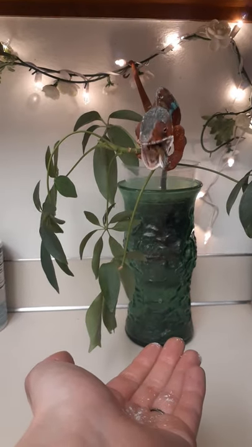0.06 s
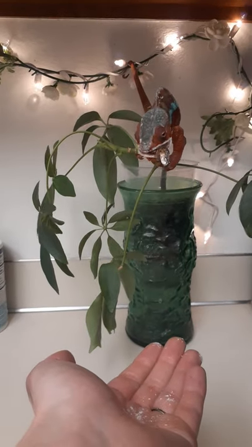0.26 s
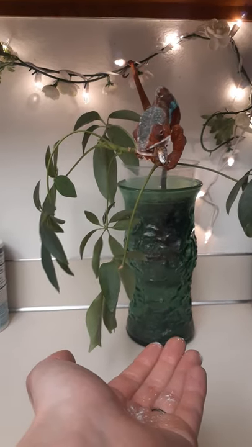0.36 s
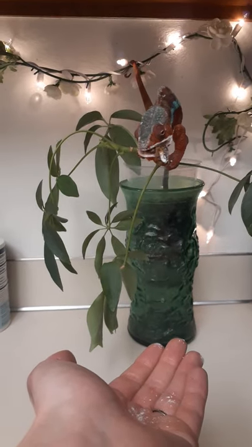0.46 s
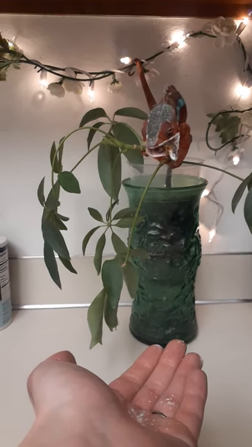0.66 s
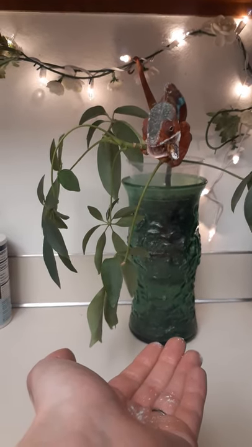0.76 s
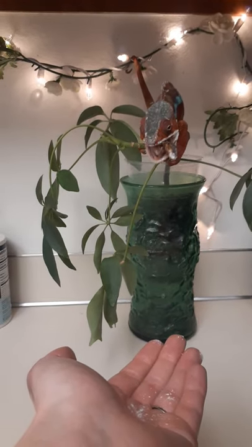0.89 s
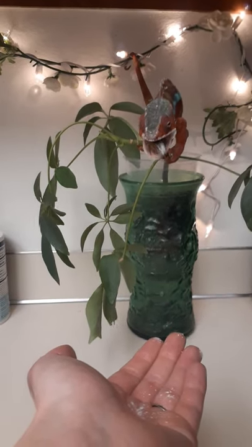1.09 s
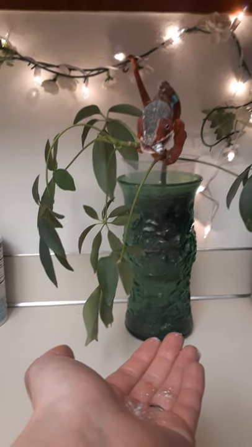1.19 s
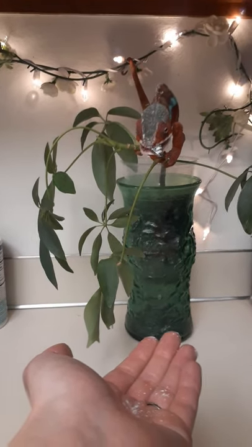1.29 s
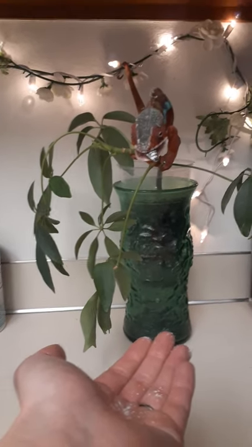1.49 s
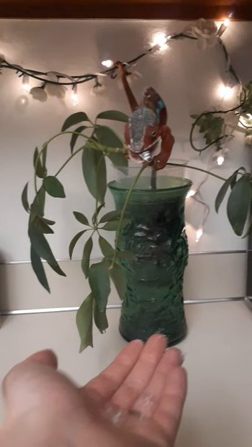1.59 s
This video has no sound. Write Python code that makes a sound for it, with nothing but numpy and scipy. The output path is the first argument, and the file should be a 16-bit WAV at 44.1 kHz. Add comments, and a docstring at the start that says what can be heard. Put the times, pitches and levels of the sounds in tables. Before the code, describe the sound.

Crisp crunching of a chameleon chewing an insect twice, with soft microphone bumps.

```python
"""A chameleon chews an insect in a small, quiet room, close to a hand-held camera; mains hum and faint hiss.
0.13-0.32 s: first bite. The shell creaks, then cracks in quick runs of tiny fractures; the room rings.
0.2-0.8 s: the hand bumps the camera softly at the left microphone. Stray cracks follow the bite until 1 s.
1.16-1.41 s: second bite, with a creak, cracks and more bumps.
From 1.45 s: a faint rustle as the camera shifts."""
import sys
import numpy as np
from scipy import signal
from scipy.fft import rfft, irfft
from scipy.io import wavfile
from scipy.ndimage import uniform_filter1d

SR = 44100
rng = np.random.default_rng(int(sys.argv[2]) if len(sys.argv) > 2 else 0)


def int16_out(signal):
    """Quantize to a 16-bit WAV file."""
    q = np.round(np.clip(np.atleast_2d(signal).T, -1, 1) * 32767)
    wavfile.write(sys.argv[1], SR, q.astype(np.int16))


N = 72765

# insect shell spectrum (frequency [Hz], gain [dB])
SHELL_SPECTRUM = [(300, -33), (1000, -45), (2500, -22.5), (3600, -18), (4600, -9.5), (6500, -8.5),
                  (8300, -9.5), (10000, -3), (11700, 0.5), (13000, -2.5), (15000, -0.5), (16800, -17.5)]


def chewing(echo_count=3):
    """Cracks and creaks of the shell, echoing in the room, dealt in turn among random echo patterns."""
    # (time [s], relative level [dB], length [s], mouth ring [dB], piece ring [dB], piece pitch [Hz])
    cracks = [(.1333, -64, 0.0018, 12, 22, 6750), (.1585, -34, 0.0026, 2, 5, 6000),
              (.1662, -24.5, 0.0037, 12, 5.5, 5060), (.1765, -34, 0.0035, 2, 3, 6000),
              (.1810, -24, 0.0036, -28, 3, 6500), (.2025, -1.5, 0.00066, -21, 4, 7130),
              (.2110, -23.5, 0.0024, 14, 0, 7500), (.2180, -30.5, 0.005, 19, -8, 7500),
              (0.2536, -18, 0.0031, 5.5, -9, 6100), (0.2706, -24.5, 0.0008, 6, 3, 6500),
              (.2765, -21, 0.0018, 8.5, 2, 6150), (.2790, -16.5, 0.0024, 2, -1, 6200),
              (.2911, -17.5, 0.00052, 4, 8.5, 5160), (.2923, -5, 0.0012, -4, 2.5, 5600),
              (.2947, -7.5, .0018, 0.5, 0.5, 5250), (.3128, -17.5, 0.002, 3, 8.5, 4940),
              (.5241, -29.5, .0008, 10.5, 1, 5600), (0.826, -44.5, 0.0021, 13, 11.5, 6300),
              (0.962, -39, 0.0028, -29, 9, 6750), (0.9763, -32.5, 0.0044, 4, 12.5, 6200),
              (1.1765, -47, .002, -1, 5, 6700), (1.1994, -41, 0.00087, 13, 5, 6700),
              (1.212, -49, 0.0026, 27, -10, 6700), (1.2183, -41.5, 0.0037, -5, 18.5, 7400),
              (1.2400, -28, 0.0013, 18, 2, 6400), (1.2494, -31, 0.0023, -14, 24.5, 6600),
              (1.2650, -12.5, 0.0019, 8.5, 12, 5370), (1.272, -20.5, 0.0025, 13.5, 6, 5650),
              (1.2792, -21.5, 0.0016, 18.5, 13, 5000), (1.289, -21, 0.0072, 7, -7, 5500),
              (1.299, -27.5, 0.005, 15, -10, 5500), (1.3190, -31.5, 0.0011, 10, -5, 5230)]
    # jaw pressure on the shell (start [s], length [s], relative level [dB], low ring [dB])
    squeezes = [(0.136, 0.095, -72, 9.5), (1.163, 0.15, -76, 0)]
    echo_groups = np.zeros((echo_count, N))
    for source, events in ((crack, cracks), (creak, squeezes)):
        for k, (start_s, *settings) in enumerate(events):
            add(echo_groups[k % echo_count], start_s, source(*settings))
    return sum(microphones(group) for group in echo_groups)


def crack(level_db, length_s, mouth_db, piece_db, piece_hz, size=2048):
    """A dying run of tiny fractures rings the breaking piece, the shell and the hollow mouth."""
    fractures_per_s, spread_db, rise_s = 6400, 0.5, 0.00042
    mouth_hz, mouth_width_hz, piece_width_oct = 1741, 486, 0.4
    t, hz = np.arange(size) / SR, np.fft.rfftfreq(size, 1 / SR)
    onsets = (rng.random(size) < fractures_per_s / SR) | (t == 0)
    fractures = onsets * rng.choice([-1, 1], size) * amp(spread_db * rng.standard_normal(size))
    envelope = (1 - np.exp(-(t + 1 / SR) / rise_s)) * np.exp(-(t / length_s) ** 2)
    run = rfft(fractures * envelope)
    run /= np.sqrt(uniform_filter1d(abs(run) ** 2, size=60) + 1e-12)  # whiten
    piece = np.exp(-(np.log2((hz + 1) / piece_hz) / piece_width_oct) ** 2)
    below_pitch = 0.5 - 0.5 * np.tanh((hz - 0.854 * piece_hz) / 160)  # the piece radiates less here
    shell = amp(log_interp(SHELL_SPECTRUM, hz) + piece_db * piece - 5.5 * below_pitch)
    mouth = amp(mouth_db - 9.5) / (1 + ((hz - mouth_hz) / mouth_width_hz) ** 4)
    ring = minimum_phase(np.hypot(shell, mouth))
    return amp(level_db - 4.5) * irfft(run * rfft(ring))[:size // 2]


def creak(length_s, level_db, low_db, size=8192):
    """Dense tiny slips, growing with pressure, ring two narrow resonances over a thin fizz."""
    slips_per_s, growth_db, fizz_db = 1500, 1, -7
    low_hz, low_width_hz, high_hz, high_width_hz = 2536, 230, 6420, 760
    progress, hz = np.arange(size) / SR / length_s, np.fft.rfftfreq(size, 1 / SR)
    slips = unit_rms(rng.standard_normal(size) * (rng.random(size) < slips_per_s / SR))
    envelope = (progress < 1) * amp(level_db + growth_db * np.minimum(progress, 1))
    low_ring = amp(low_db) / (1 + ((hz - low_hz) / low_width_hz) ** 2)
    high_ring = 1 / (1 + ((hz - high_hz) / high_width_hz) ** 2)
    fizz = amp(fizz_db + log_interp(SHELL_SPECTRUM, hz))
    return irfft(rfft(slips * envelope) * unit_rms(low_ring + high_ring + fizz))


def microphones(dry):
    """Jaw sound arrives earlier on the left, smeared by the camera case, louder on the right; room added."""
    # left microphone faces away (frequency [Hz], gain [dB])
    left_shade = [(500, -7), (1500, -3.5), (3000, 2.5), (6000, 0), (9000, 1), (12000, -1.5), (16000, -2.5)]
    case_db, case_t60_s, left_db, lead_samples = 2, 0.0091, -11, 6
    t = np.arange(SR // 100) / SR
    case = rng.standard_normal(len(t)) * amp(-60 * t / case_t60_s)
    early = np.roll(dry, -lead_samples)
    smear = amp(case_db) * signal.fftconvolve(early, case / np.linalg.norm(case))[:N]
    left, right = np.array([amp(left_db) * (early + smear), dry]) + room(dry)
    return np.array([equalise(left, left_shade), right])


def room(dry):
    """Quick echoes from wall and shelf, then the room tail."""
    # (frequency [Hz], T60 [s])
    decay = [(500, 0.59), (2000, .42), (6000, 0.18), (11000, 0.14), (16000, 0.18)]
    near_db, near_t60_s, tail_db, left_db, rise_s = -5, 0.046, -8, -0.5, 0.00092
    t = np.arange(SR // 2) / SR
    near, tail = rng.standard_normal((2, 2, len(t)))
    rise = 1 - np.exp(-t / rise_s)
    near = near * rise * amp(-60 * t / near_t60_s)
    hz, frame_s, spectra = signal.stft(tail, SR, nperseg=256)
    spectra *= amp(-60 * frame_s / log_interp(decay, hz)[:, None])
    tail = signal.istft(spectra, SR, nperseg=256)[1][:, :len(t)] * rise
    response = amp(near_db) * near / np.linalg.norm(near[0]) + amp(tail_db) * tail / np.linalg.norm(tail[0])
    return signal.fftconvolve(dry[None], response, axes=1)[:, :N] * amp([[left_db], [0]])


def hand_bumps():
    """Soft, heavily damped thuds of the camera case, each trailed by skin rubbing on it."""
    # (time [s], envelope peak [dB], pitch [Hz])
    bumps = [(0.203, -43.5, 61), (0.2539, -42.5, 67), (0.291, -39, 58.7), (0.332, -40, 99),
             (0.476, -35, 88.6), (0.496, -29, 106.3), (0.515, -32.5, 95.5), (0.5695, -34.5, 97.2),
             (0.5991, -37, 95.4), (0.6635, -36, 61), (0.733, -48, 72), (.764, -36, 85), (0.8, -41.5, 88),
             (1.2223, -36.5, 83), (1.2426, -28.5, 91.7), (1.2560, -33.5, 198), (1.2718, -32.5, 80.6),
             (1.2933, -37, 131), (1.318, -42, 70), (1.3685, -38, 96), (1.407, -47, 83)]
    # (frequency [Hz], relative level [dB])
    rub_spectrum = [(15, -31.5), (30, -17.5), (50, 3.5), (150, -3.5), (260, -17.5), (450, -32),
                    (1000, -63.5)]
    rise_cycles, right_db = 0.76, -36
    rub_db, rub_rise_s, rub_fade_s = -6.5, 0.0067, 0.036
    t, thuds, rub_power = np.arange(SR // 4) / SR, np.zeros(N), np.zeros(N)
    for start_s, peak_db, hz in bumps:
        age = t * hz / rise_cycles
        thud_envelope = amp(peak_db) * (age * np.exp(1 - age)) ** 2
        add(thuds, start_s, -thud_envelope * np.sin(2 * np.pi * hz * t))
        rub_envelope = amp(peak_db) * np.minimum(t / rub_rise_s, 1) * np.exp(-t / rub_fade_s)
        add(rub_power, start_s, rub_envelope ** 2)
    rub = amp(rub_db) * np.sqrt(rub_power) * stereo_noise(rub_spectrum)
    return (thuds + rub) * amp([[0], [right_db]])


def rustle():
    """A faint rustle swells as the camera shifts."""
    # (time [s], level [dB])
    swell = [(1.44, -105), (1.52, -76), (1.6, -71.5), (1.65, -74)]
    # (frequency [Hz], relative level [dB])
    spectrum = [(1000, 20), (3000, -4.5), (5500, 6.5), (9000, -1.5), (15000, -44.5)]
    return stereo_noise(spectrum) * amp(np.interp(np.arange(N) / SR, *np.transpose(swell)))


def room_air(level_db=-60, flicker_db=1.75):
    """Room air and microphone hiss, flickering slightly in patches of time and frequency."""
    # (frequency [Hz], relative density [dB])
    spectrum = [(15, -44), (28, -15.5), (45, -6), (64, -14), (92, -5), (134, 0.5), (190, -11), (263, -11.5),
                (439, -21.5), (600, -26.5), (860, -28.5), (1020, -33.5), (1200, -25), (1400, -26),
                (1650, -21.5), (1950, -30), (2690, -36.5), (4370, -45), (7510, -51.5), (14400, -39),
                (16000, -52)]
    # (frequency [Hz], left-right correlation [ratio])
    correlation = [(50, 0.95), (250, 0.82), (1000, 0.15), (3000, 0.067), (12000, 0.035)]
    # (frequency [Hz], left gain [dB])
    left_tilt = [(30, 3.5), (120, -0.5), (400, 0.5), (700, 2), (1500, -4.5), (3000, -1), (8000, -0.5),
                 (15000, -1)]
    frames, hz = N // 512 + 5, np.fft.rfftfreq(2048, 1 / SR)
    left_re, left_im, own_re, own_im, patches = rng.standard_normal((frames, len(hz), 5)).T
    shared = log_interp(correlation, hz)[:, None]
    left = left_re + 1j * left_im
    right = shared * left + np.sqrt(1 - shared ** 2) * (own_re + 1j * own_im)
    left *= amp(log_interp(left_tilt, hz))[:, None]
    patches = uniform_filter1d(uniform_filter1d(patches, size=16, axis=0), size=4, axis=1)
    gain = amp(log_interp(spectrum, hz)[:, None] + flicker_db * unit_rms(patches))
    air = signal.istft(np.array([left, right]) * gain, nperseg=2048, noverlap=1536)[1][:, :N]
    return amp(level_db) * unit_rms(air)


def mains_hum():
    """Steady partials near multiples of 60 Hz."""
    # (frequency [Hz], rms level [dB])
    partials = [(59.8, -69), (119.3, -63), (240.3, -73), (360.3, -78.5), (481, -91.5), (602, -93.5)]
    t = np.arange(N) / SR
    return sum(np.sqrt(2) * amp(db) * np.sin(2 * np.pi * (hz * t + rng.random())) for hz, db in partials)


def amp(db):
    """Decibels to gain."""
    return 10 ** (np.asarray(db) / 20)


def unit_rms(x):
    """Scale to rms 1."""
    return x / np.sqrt(np.mean(x ** 2) + 1e-20)


def log_interp(points, hz):
    """Table lookup on a log-frequency axis."""
    point_hz, values = np.transpose(points)
    return np.interp(np.log(hz + 1), np.log(point_hz + 1), values)


def add(mix, start_s, sound):
    """Mix a sound in at start_s."""
    part = mix[..., round(start_s * SR):][..., :sound.shape[-1]]
    part += sound[..., :part.shape[-1]]


def equalise(x, curve):
    """Filter by a (frequency [Hz], gain [dB]) curve."""
    return irfft(rfft(x) * amp(log_interp(curve, np.fft.rfftfreq(N, 1 / SR))), N)


def stereo_noise(spectrum):
    """Two independent noises of one spectrum, rms 1."""
    return unit_rms(equalise(rng.standard_normal((2, N)), spectrum))


def minimum_phase(gain):
    """Shortest ring with this magnitude spectrum."""
    log_gain = np.log(np.maximum(gain, 1e-5))
    mirrored = np.concatenate([log_gain, log_gain[-2:0:-1]])
    return np.fft.ifft(np.exp(np.conj(signal.hilbert(mirrored)))).real


def scene():
    """Chewing, camera handling and the quiet room, in stereo."""
    return chewing() + hand_bumps() + room_air() + mains_hum() + rustle()


def record(dry):
    """Recorder low cut and band limit."""
    low_cut_hz, band_limit_hz = 22, 16250
    highpass = signal.butter(3, low_cut_hz, "high", fs=SR, output="sos")
    lowpass = signal.firwin(255, band_limit_hz, window=("kaiser", 8), fs=SR)
    return signal.oaconvolve(signal.sosfilt(highpass, dry), lowpass[None], "same")


dry = scene()
out = record(dry)
int16_out(out)
```